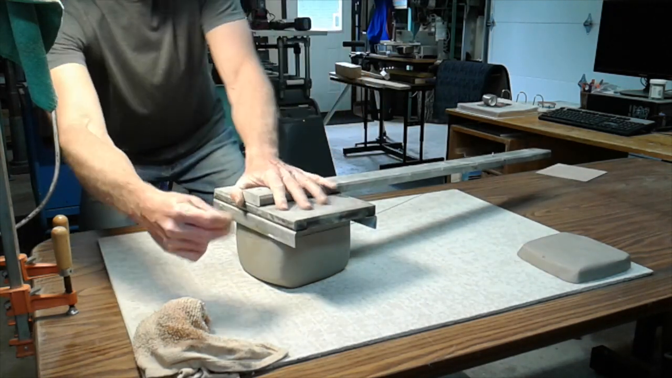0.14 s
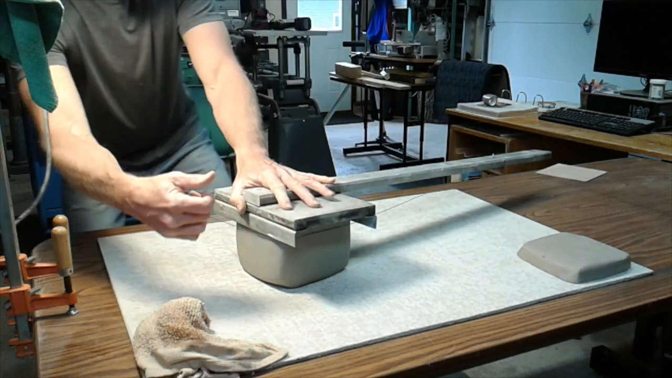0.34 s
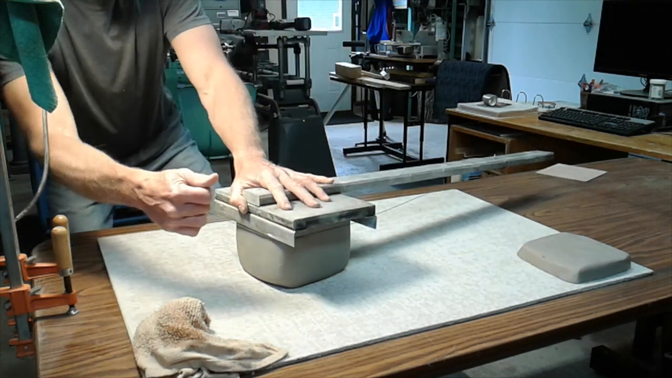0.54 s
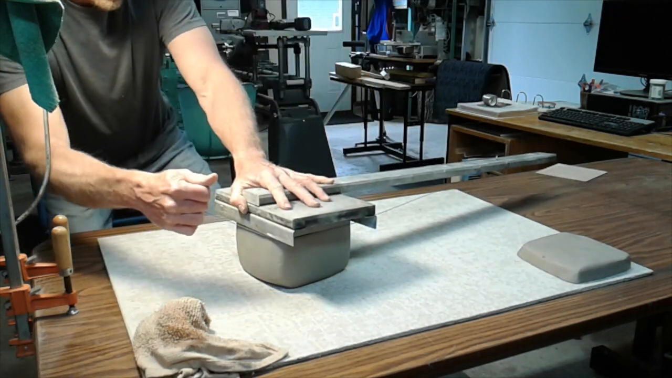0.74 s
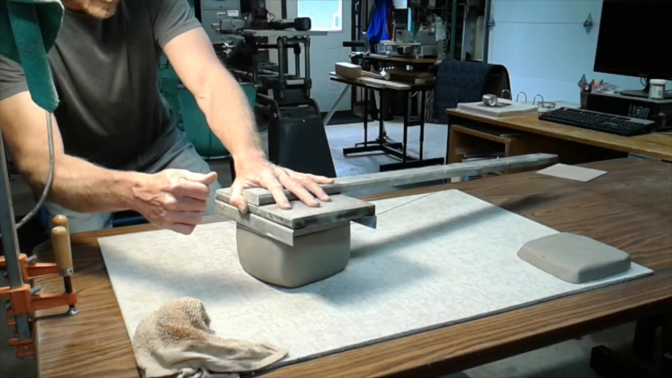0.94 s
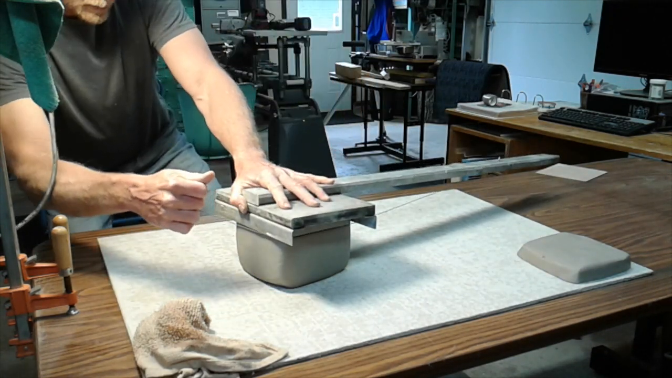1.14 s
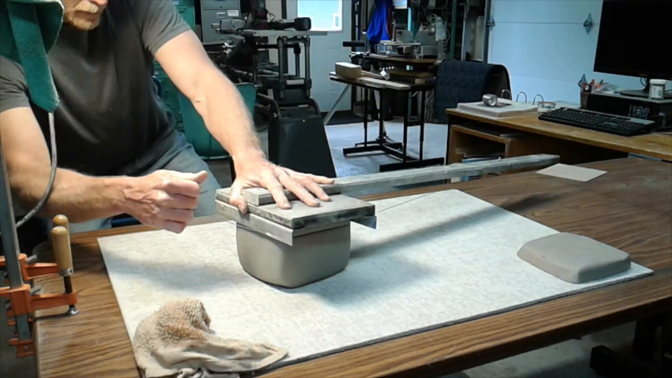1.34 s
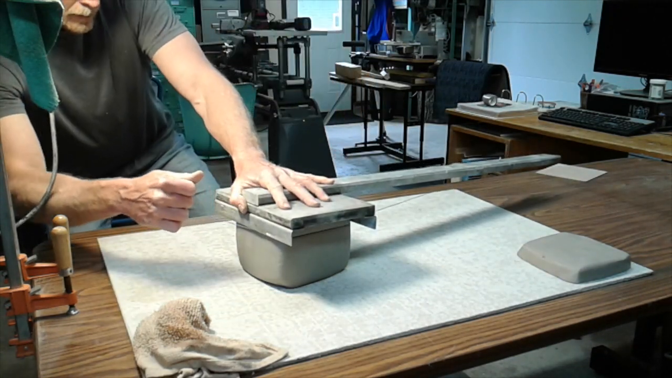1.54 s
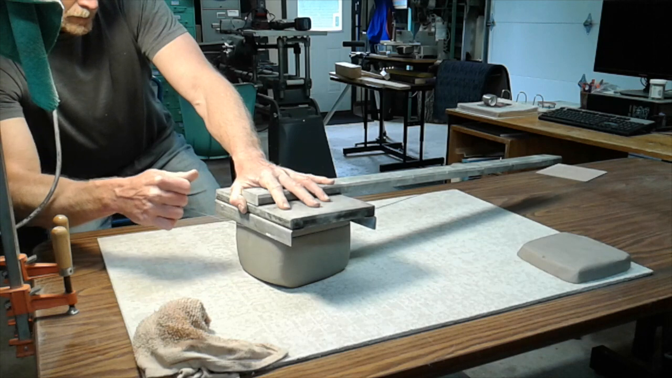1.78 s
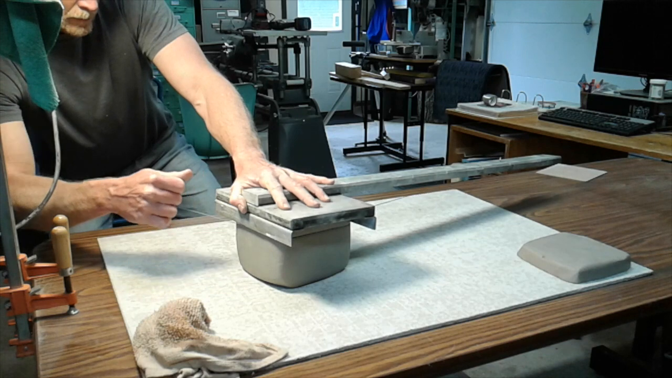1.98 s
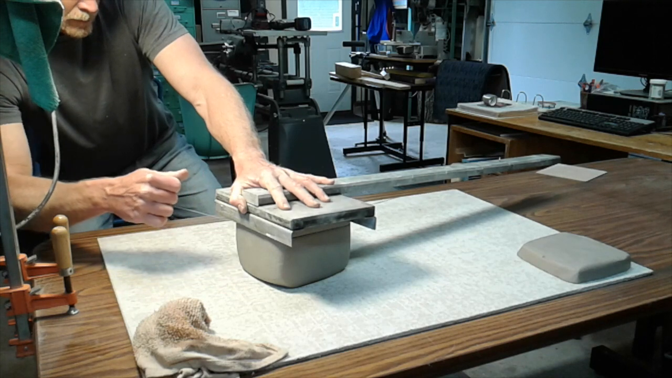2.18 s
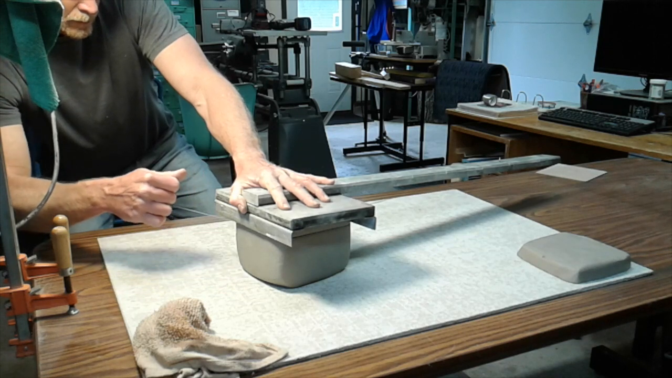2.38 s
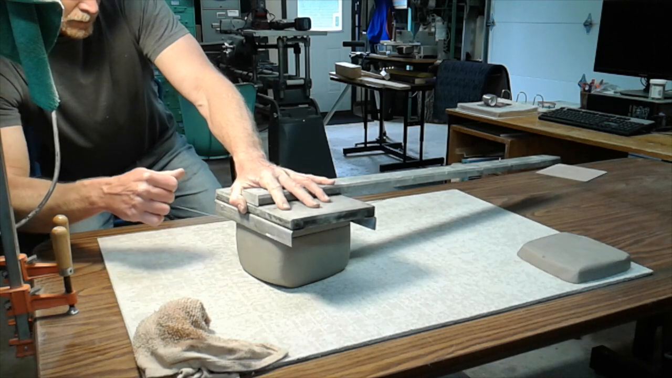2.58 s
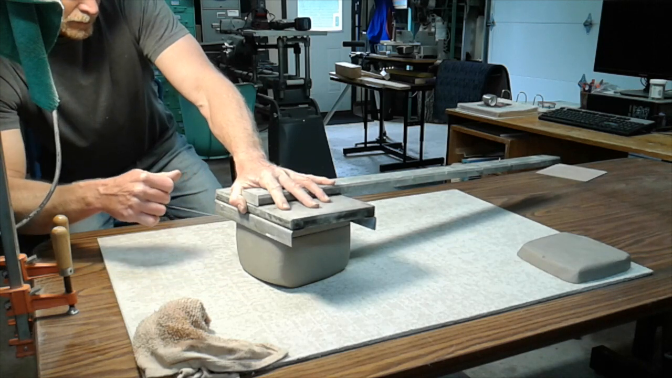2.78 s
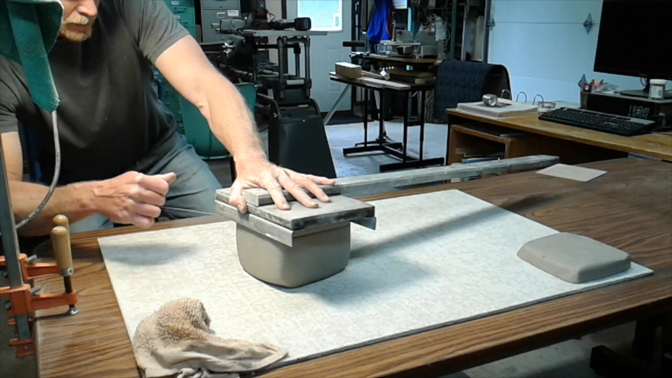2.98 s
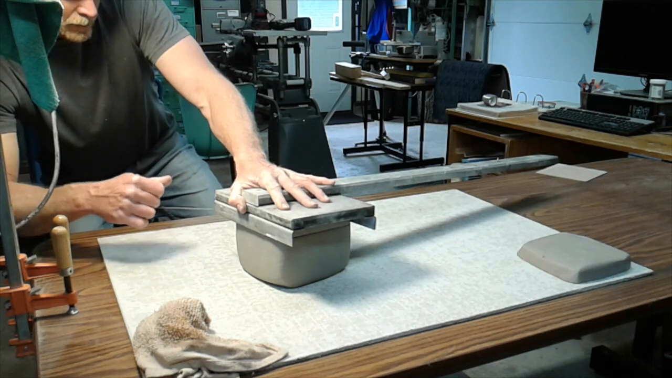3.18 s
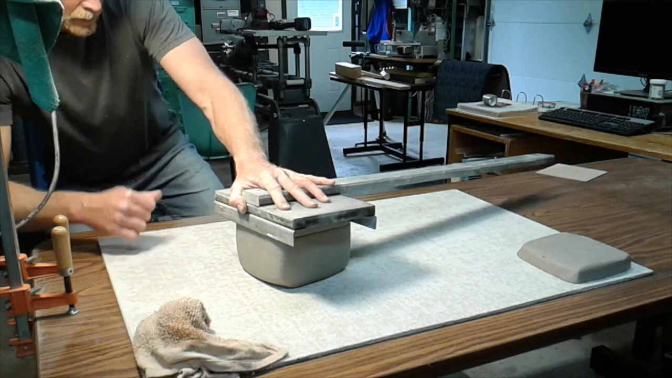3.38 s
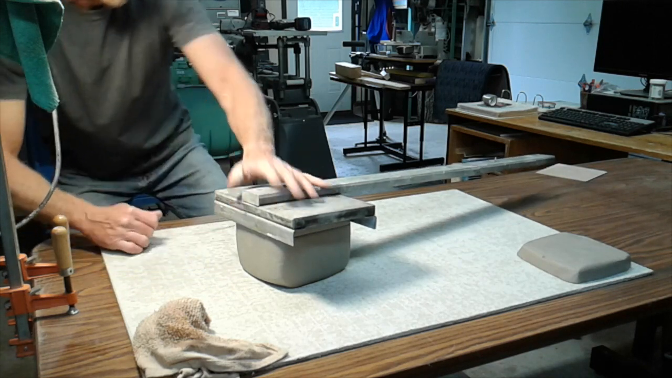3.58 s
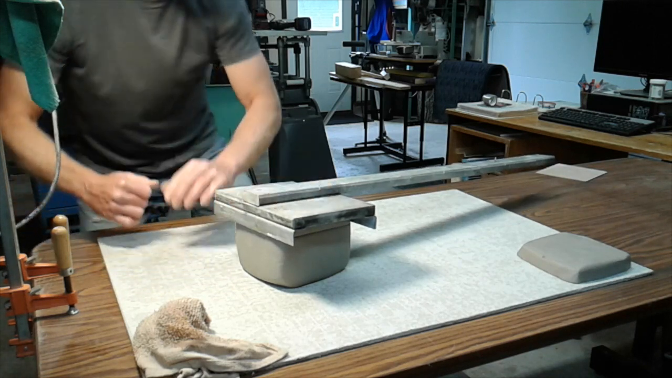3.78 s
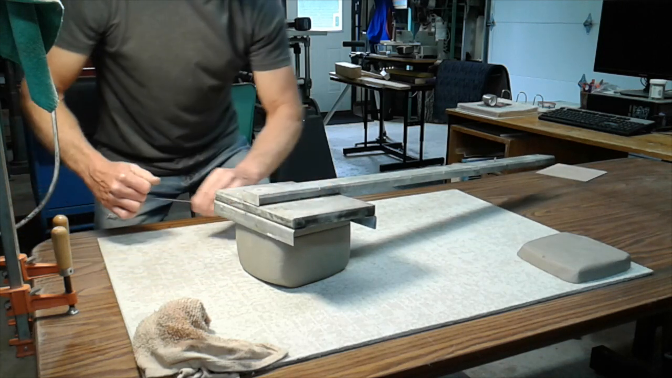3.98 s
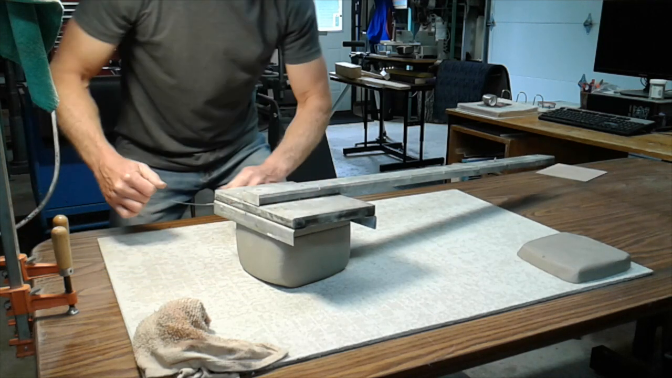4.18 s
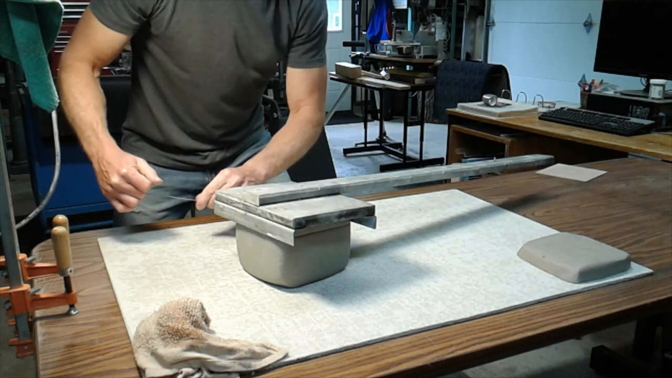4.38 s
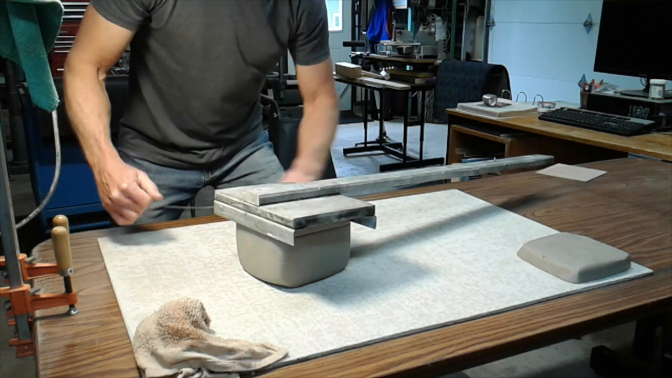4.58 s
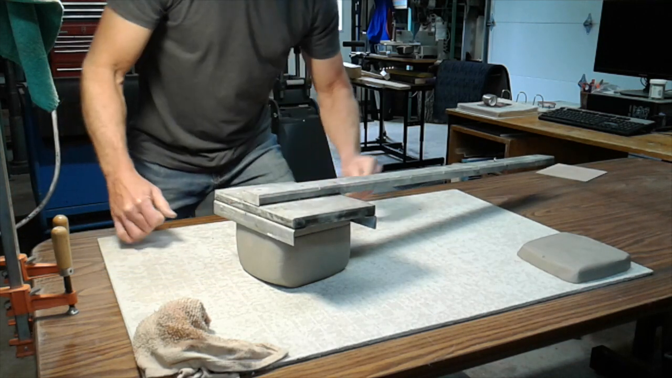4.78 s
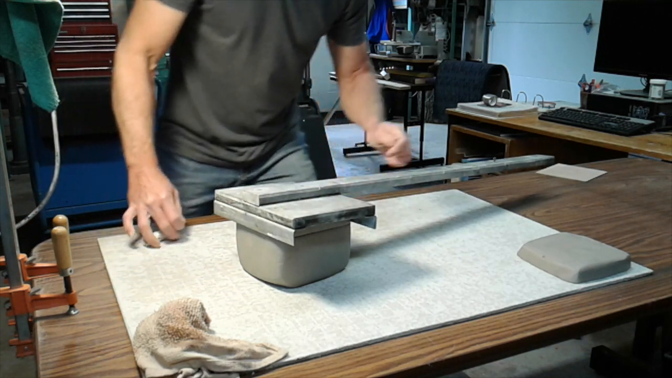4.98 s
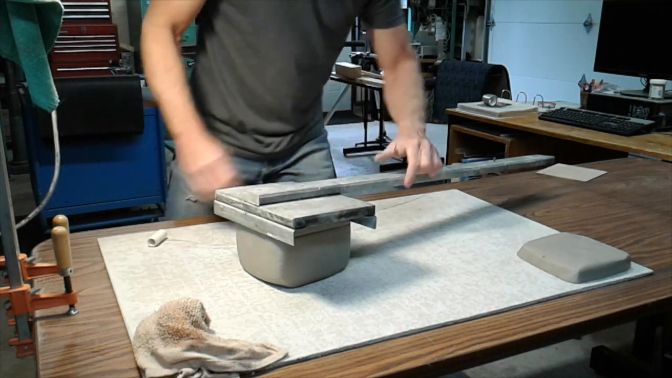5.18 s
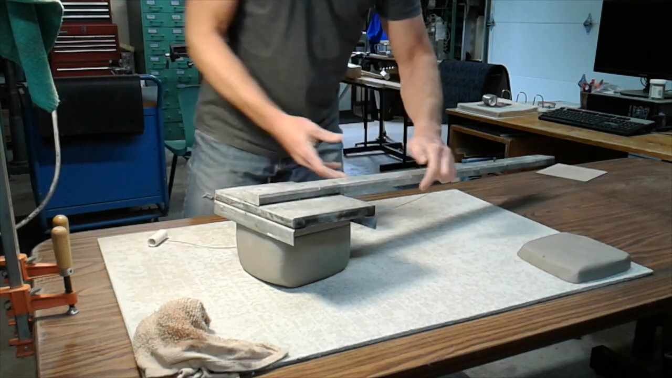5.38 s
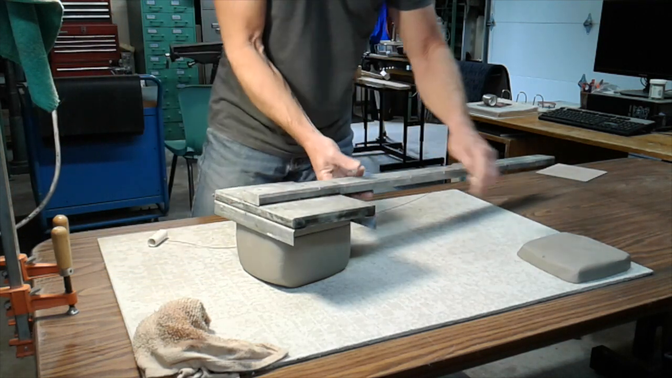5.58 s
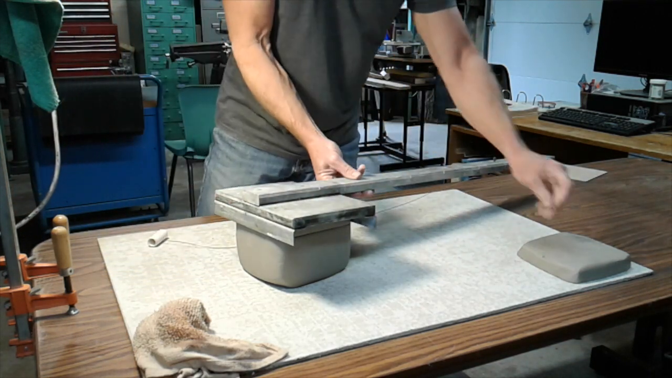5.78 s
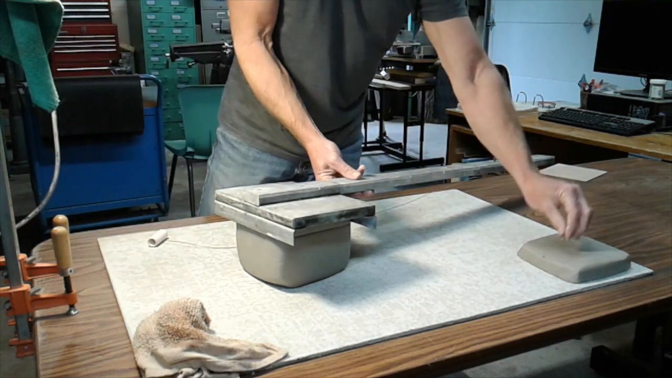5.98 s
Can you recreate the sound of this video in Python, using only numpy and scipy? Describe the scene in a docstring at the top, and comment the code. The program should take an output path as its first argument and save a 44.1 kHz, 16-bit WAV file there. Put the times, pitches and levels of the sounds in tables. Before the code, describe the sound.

Gritty stop-and-go wire scraping with metallic snaps and short groans ends in a sharp tear, followed by a wooden double knock and light skittering clicks.

```python
"""A cutting wire rasps through a block of clay along metal guides, catches, slips and at last rips free.
Its wooden handle is then dropped on the table and bounces; the slack wire skitters in short slides.
Friction is random grains through the guides' resonances; impacts are bursts through guides or table,
and light clicks are short ringing peaks with a noise scuff.
A hard-walled workshop answers nearly every sound, over air noise and a faint hum.
"""
import sys
import numpy as np
from scipy import signal
from scipy.fft import rfft, irfft, next_fast_len
from scipy.io import wavfile
from scipy.ndimage import map_coordinates

SR = 44100
rng = np.random.default_rng(int(sys.argv[2]) if len(sys.argv) > 2 else 0)


def log_audio(samples):
    """Write samples as a 16-bit WAV file to the path given in sys.argv[1]."""
    # one column per channel
    frames = np.atleast_2d(samples).T
    # limit to full scale, then quantise
    limited = np.clip(frames, -1, 1)
    pcm = np.round(limited * 32767).astype(np.int16)
    wavfile.write(sys.argv[1], SR, pcm)


N = 266272
TIME = np.arange(N) / SR  # s


def amp(db):
    """Decibels to gain."""
    return 10 ** (np.asarray(db) / 20)


def decay(t, t60):
    """Exponential decay, 60 dB down at t60 seconds."""
    return amp(-60 * t / t60)


def unit(x):
    """Scale to rms 1."""
    return x / np.sqrt(np.mean(x ** 2) + 1e-20)


def along(points, hz):
    """Read (Hz, value) points on a log frequency axis."""
    f, v = np.transpose(points)
    return np.interp(np.log(hz + 1), np.log(f + 1), v)


def curves(rows):
    """One value per sample for each column after the time."""
    s, *columns = np.transpose(rows)
    return [np.interp(TIME, s, column) for column in columns]


def during(rows, fade_s=0.033):
    """1 within the span of a curve, fading outside it."""
    first, last = rows[0][0], rows[-1][0]
    return np.interp(TIME, [first - fade_s, first, last, last + fade_s], [0, 1, 1, 0])


def wobble(rate_hz):
    """Smooth random curve through rate_hz knots a second."""
    knots = rng.standard_normal(int(N * rate_hz / SR) + 4)
    return map_coordinates(knots, [TIME * rate_hz])


def grains(size, rate_hz, spread_db):
    """Tiny random slips, rate_hz a second on average, of either sign and unequal strength."""
    signs, sizes = rng.choice([-1, 1], size), rng.uniform(-1, 1, size)
    return (rng.random(size) < rate_hz / SR) * signs * amp(spread_db * sizes)


def response(gain, size=8192):
    """Causal (minimum-phase) impulse response with the given gain of frequency."""
    hz = np.fft.rfftfreq(size, 1 / SR)
    cepstrum = irfft(np.log(np.maximum(gain(hz), 1e-6)))
    cepstrum[1:size // 2] *= 2
    cepstrum[size // 2 + 1:] = 0
    return irfft(np.exp(rfft(cepstrum)))


def coloured(x, gain):
    """Filter a sound by a gain of frequency."""
    return signal.oaconvolve(x, response(gain))[:len(x)]


def body(spectrum, modes, lift_db):
    """Gain of a broad spectrum with resonances standing out of it."""
    def peaks(hz):
        return sum(amp(db) / (1 + (2 * (hz - f) / width) ** 2) for f, width, db in modes)
    return lambda hz: amp(along(spectrum, hz)) * (1 + amp(lift_db) * peaks(hz))


def registers(x, edges_hz):
    """Split a sound into neighbouring bands, each of rms 1."""
    bands = []
    for edge in edges_hz:
        bands.append(signal.sosfilt(signal.butter(5, edge, 'low', fs=SR, output='sos'), x))
        x = signal.sosfilt(signal.butter(5, edge, 'high', fs=SR, output='sos'), x)
    return [unit(b) for b in bands + [x]]


def add(track, s, sound):
    """Mix a sound into the track at time s."""
    start = max(round(s * SR), 0)
    track[start:start + len(sound)] += sound[:N - start]


# Room decay. Each row: frequency in Hz, t60 in s.
WALL_DECAY = [(100, 1), (400, 0.8), (1200, 0.39), (3000, 0.45), (7000, 0.35), (14000, 0.2)]


def workshop(x, wet_db, near_db=-3, near_t60=0.12):
    """Direct sound, a flurry from table and near walls, then the room's tail."""
    hz, t, z = signal.stft(rng.standard_normal(int(SR * .6)), SR, nperseg=256)
    tail = signal.istft(z * decay(t, along(WALL_DECAY, hz)[:, None]), SR, nperseg=256)[1]
    t = np.arange(len(tail)) / SR
    near = rng.standard_normal(len(t)) * decay(t, near_t60)
    late = np.clip((t - .002) / .004, 0, 1)  # reflections enter at 2 to 6 ms
    tail = amp(wet_db) * tail / np.linalg.norm(tail)
    near = amp(near_db) * near / np.linalg.norm(near)
    room = late * (tail + near)
    room[0] = 1
    return signal.fftconvolve(x, room)


# The pull. Each row: time in s, friction level in dB, brightness in dB (higher as the wire runs tighter).
PULL_CURVE = [(0, -48.5, 2), (.12, -56, 0), (.21, -68, 9), (.31, -54, 0.5), (.45, -59, -8), (.69, -51, 0.5),
              (.8, -58, -5.5), (1.06, -51.5, -2.5), (1.24, -46.5, -0.5), (1.54, -52.5, 0.5), (1.92, -48, 1),
              (2.02, -53, 1), (2.13, -53, 1), (2.22, -56.5, 0.5), (2.54, -59, -5.5), (2.76, -50, 0),
              (2.92, -49, 0.5), (3.13, -54, -0.5), (3.24, -46, 5), (3.39, -75, -4)]
# Wire on the guides. Each row: frequency in Hz, level in dB.
GUIDE_SPECTRUM = [(45, -29), (80, -15.5), (160, -3.5), (260, -10.5), (340, -6.5), (800, -3), (1300, -4),
                  (2000, -7), (3200, -4.5), (4400, -12.5), (5500, -12.5), (6700, -8.5), (9800, -39),
                  (15000, -51)]
# Ring of the metal guides. Each row: frequency in Hz, width in Hz, level before the lift in dB.
GUIDE_RING = [(349, 26, -6), (462, 19, -3), (590, 10, -6.5), (793, 16, 4), (810, 45, -7), (1107, 96, 1.5),
              (1450, 24, -8.5), (1835, 54, -4), (2490, 25, 1.5), (2660, 39, 2), (3096, 35, -2),
              (4880, 74, 4), (6100, 210, -13)]
USUAL_DB = -51.5  # friction of a steady pull
DRAG_DB, RASP_DB, GRIT_DB, HISS_DB = -4, -2.5, 0, -6  # relative to the friction level
DRAG_GROWS, HISS_GROWS = .9, 1.22  # dB per dB of friction
DRAG_TILT, RASP_TILT, GRIT_TILT = .3, .1, 0.27  # brightness share: taken from drag and rasp, given to grit


def scrape():
    """Dense micro-slips shake the clay and the guides; a harder pull is louder and hisses more."""
    friction = grains(N, rate_hz=2500, spread_db=9) * amp(2.3 * wobble(70))
    guided = coloured(friction, body(GUIDE_SPECTRUM, GUIDE_RING, lift_db=-4.0))
    ringing = workshop(guided, wet_db=-1.5)[:N]
    drag, rasp, grit, hiss = registers(ringing, [550, 1500, 4200])
    level_db, bright_db = curves(PULL_CURVE)
    effort_db = level_db - USUAL_DB
    return during(PULL_CURVE) * amp(USUAL_DB) * (
        drag * amp(DRAG_DB + DRAG_GROWS * effort_db - DRAG_TILT * bright_db)
        + rasp * amp(RASP_DB + effort_db - RASP_TILT * bright_db)
        + grit * amp(GRIT_DB + effort_db + GRIT_TILT * bright_db)
        + hiss * amp(HISS_DB + HISS_GROWS * effort_db + bright_db))


# Catches of the wire. Each row: time in s, strength in dB, brightness in dB.
SLIP_EVENTS = [(.004, -67, -5), (0.0962, -66, -0.5), (.2206, -71.5, -4), (0.254, -62, 1),
               (.2829, -61, -1.5), (.3227, -63, -1.5), (.3679, -59, -2), (0.481, -65.5, -4),
               (0.5046, -64, -1), (0.555, -61, -2), (.702, -59.5, -0.5), (.821, -53.5, 1),
               (0.9206, -53.5, 0.5), (1.071, -71, -5), (1.1263, -49.5, 0), (1.161, -56.5, -2),
               (1.2072, -54.5, -1), (1.3209, -55.5, 0), (1.4046, -56.5, 1.5), (1.4551, -55, 0.5),
               (1.574, -54, 1), (1.7471, -58, 1.5), (1.811, -57.5, 2.5), (1.8898, -58.5, -1),
               (2.0494, -57, 1.5), (2.0724, -55.5, -0.5), (2.1209, -58.5, 0), (2.258, -73, 4),
               (2.285, -68, 0), (2.428, -73, -1), (2.5081, -60, -4), (2.58, -56, -5), (2.6345, -59, -4),
               (2.6868, -58, -3), (2.7848, -61, -3), (2.8994, -62.5, 8), (3.0612, -58, 2),
               (3.1879, -61, 1.5), (3.2133, -58, 5), (3.2241, -54, 2)]
SLIP_T60, SNAP_T60, SNAP_DB = 0.039, 0.017, 3  # chatter decay s; the first snap is shorter and stronger
KNOCK_DB, ZING_DB = -.5, -6  # low and high ring, relative to the strength
CRACK_TILT = .35  # share of the brightness given to the mid-range crack


def slips():
    """Each catch lets go with a snap and a chatter; both ring the guides, as a dull knock or bright zing."""
    out, t = np.zeros(N), np.arange(int(SR * .1)) / SR
    guides = response(body(GUIDE_SPECTRUM, GUIDE_RING, lift_db=-4.5))
    # a snap is too brief to shake the heavy block
    guides = signal.lfilter(*signal.butter(2, 260, 'high', fs=SR), guides)
    knock, crack, zing = registers(guides, [1400, 4500])
    envelope = decay(t, SLIP_T60) + amp(SNAP_DB) * decay(t, SNAP_T60)
    for s, db, bright_db in SLIP_EVENTS:
        chatter = grains(len(t), rate_hz=7000, spread_db=4.5) * envelope
        ring = (knock * amp(KNOCK_DB - bright_db)
                + crack * amp(CRACK_TILT * bright_db)
                + zing * amp(ZING_DB + bright_db))
        snap = signal.fftconvolve(chatter / np.linalg.norm(chatter), ring)
        add(out, s, amp(db) * workshop(snap, wet_db=-0.5, near_db=-0.5))
    return out


# Groans of the guide. Each row: start in s, length in s, frequency in Hz, level in dB.
GROAN_EVENTS = [(.27, .12, 943, -47.5), (.32, 0.093, 804, -52), (.485, 0.043, 755, -46.5),
                (.555, 0.078, 755, -46.5), (.68, 0.082, 880, -51), (0.351, .09, 3100, -56.5),
                (0.502, 0.18, 3260, -56), (1.017, 0.084, 2700, -53), (1.127, .07, 1120, -47),
                (1.127, 0.062, 590, -48.5), (2.58, .04, 594, -48), (2.687, 0.048, 860, -45.5),
                (2.79, 0.087, 607, -47), (2.79, .22, 333.6, -52), (2.89, .13, 1188, -49)]
GROAN_Q = 16.3  # frequency over width of the narrow resonance


def groans():
    """Stick and slip feeds one narrow resonance for a moment."""
    out = np.zeros(N)
    for s, length_s, hz, db in GROAN_EVENTS:
        size = int(max(length_s, .02) * SR)
        stick_slip = grains(size, rate_hz=1500, spread_db=7)
        ring = signal.lfilter(*signal.iirpeak(hz, GROAN_Q, fs=SR), stick_slip)
        # the clay damps what lies far from the resonance
        ring = signal.lfilter(*signal.iirpeak(hz, 2, fs=SR), ring)
        groan = unit(ring) * signal.windows.tukey(size, .2)
        add(out, s, amp(db) * workshop(groan, wet_db=-7.5, near_db=-11))
    return out


def shudder(s=1.127, db=-50, hz=175, q=1.9, rise_s=.012, t60=0.71):
    """The hardest catch jolts the heavy block, which rumbles briefly on the table."""
    out, t = np.zeros(N), np.arange(SR // 2) / SR
    band = signal.iirpeak(hz, q, fs=SR)
    rumble = signal.lfilter(*band, rng.standard_normal(len(t)))
    rumble = unit(signal.lfilter(*band, rumble))
    add(out, s, amp(db) * decay(t, t60) * np.minimum(t / rise_s, 1) * rumble)
    return out


# Wire leaving the clay. Each row: frequency in Hz, level in dB.
RIP_SPECTRUM = [(60, -18), (150, 1.5), (260, -8), (650, -13), (1100, -1), (2300, -5), (4500, -14.5),
                (7000, -2), (9000, -19), (12000, -28), (15500, -33)]


def rip(s=3.226, db=-34, rise_s=0.0023, t60=0.13):
    """The taut wire tears out of the last corner of the block."""
    out, t = np.zeros(N), np.arange(SR // 2) / SR
    tear = unit(coloured(rng.standard_normal(len(t)), lambda hz: amp(along(RIP_SPECTRUM, hz))))
    envelope = np.minimum(t / rise_s, 1) * decay(t, t60)
    add(out, s, workshop(amp(db) * envelope * tear, wet_db=-1.0))
    return out


# Loose wire. Each row: frequency in Hz, level in dB.
WIRE_SPECTRUM = [(300, -15.5), (700, -6), (1100, -2.5), (1700, -5.5), (2700, -3.5), (4600, -12), (6000, -4),
                 (7000, 1.5), (8000, -10), (9500, -18.5), (15000, -35.5)]


def twitch(s=3.4605, db=-39, t60=0.016):
    """The freed wire flicks once against the guide."""
    out, t = np.zeros(N), np.arange(int(SR * .05)) / SR
    flick = unit(coloured(rng.standard_normal(len(t)), lambda hz: amp(along(WIRE_SPECTRUM, hz))))
    add(out, s, workshop(amp(db) * decay(t, t60) * flick, wet_db=-1, near_db=-6))
    return out


def release(s=3.583, db=-60, rise_s=0.004, t60=0.59):
    """The steadying hand brushes softly off the guide."""
    out, t = np.zeros(N), np.arange(SR // 2) / SR
    brush = unit(coloured(rng.standard_normal(len(t)), lambda hz: amp(along(GUIDE_SPECTRUM, hz))))
    envelope = np.minimum(t / rise_s, 1) * decay(t, t60)
    add(out, s, workshop(amp(db) * envelope * brush, wet_db=-3.0))
    return out


# Handle hits on the table. Each row: time in s, clack in dB, knock in dB, tick in dB.
DROP_EVENTS = [(4.8507, -57.5, -42, -68), (4.9342, -51.5, -48, -72)]
# Handle on the table. Each row: frequency in Hz, level in dB.
TABLE_SPECTRUM = [(60, -31), (120, -10), (260, -19), (400, -9), (750, -7.5), (1150, -0.5), (1550, -5),
                  (2000, -10.5), (2600, -10), (3300, -20), (4500, -17.5), (5900, -27), (7000, -22),
                  (9000, -45), (15000, -63)]
# Ring of the table top. Each row: frequency in Hz, width in Hz, level before the lift in dB.
TABLE_RING = [(624, 36, -4), (786, 30, 5.5), (1080, 90, 4), (1260, 85, -3), (1465, 35, 4), (1630, 44, -4)]


def drops(rock_db=-6, rock_t60=0.032):
    """The handle lands hard, rocks for an instant and bounces; the table top knocks."""
    out, t = np.zeros(N), np.arange(int(SR * .04)) / SR
    table = response(body(TABLE_SPECTRUM, TABLE_RING, lift_db=-1.0))
    knock, clack, tick = registers(table, [1800, 4500])
    for s, clack_db, knock_db, tick_db in DROP_EVENTS:
        contact = rng.standard_normal(len(t)) * decay(t, rock_t60)
        contact *= amp(rock_db) / np.linalg.norm(contact)
        contact[0] = 1
        ring = knock * amp(knock_db) + clack * amp(clack_db) + tick * amp(tick_db)
        hit = signal.fftconvolve(contact, ring)
        add(out, s, workshop(hit, wet_db=-1.5, near_db=-4.5, near_t60=0.075))
    return out


# Light clicks of handle and wire ends. Each row: time in s, low band in dB, high band in dB.
CLICK_EVENTS = [(4.672, -76, -89), (5.023, -55, -55), (5.07, -59, -59), (5.203, -66.5, -63.5),
                (5.363, -77, -90), (5.406, -77.5, -77.5), (5.455, -76, -80), (5.496, -78.5, -78),
                (5.622, -83, -86)]
# Peaks of a click, coloured by a close reflection. Each row: frequency in Hz, mean level in dB, t60 in s.
CLICK_PEAKS = [(1090, -2, 0.038), (2100, -12, 0.015), (2787, -6, 0.012), (4130, 0.5, 0.022),
               (5260, -0.5, 0.013), (5940, -3, 0.0084), (6850, -10, .012)]


def clicks(contact_t60=0.017, contact_db=-2, edge_hz=7000):
    """Light clicks with short ringing peaks, coloured by a close reflection, strengths drawn anew each time."""
    out, t = np.zeros(N), np.arange(int(SR * .08)) / SR
    for s, low_db, high_db in CLICK_EVENTS:
        strengths_db = rng.uniform(-3, 3, len(CLICK_PEAKS))
        phases = rng.uniform(0, 2 * np.pi, len(CLICK_PEAKS))
        ring = np.zeros(len(t))
        for (hz, level_db, t60), luck_db, phase in zip(CLICK_PEAKS, strengths_db, phases):
            ring += amp(level_db + luck_db) * decay(t, t60) * np.sin(2 * np.pi * hz * t + phase)
        scuff = rng.standard_normal(len(t)) * decay(t, contact_t60)
        contact = coloured(scuff, lambda hz: amp(along(WIRE_SPECTRUM, hz)))
        # the peaks stay mostly in the direct sound; the scuffed table fills the room
        direct = workshop(unit(ring), wet_db=-8, near_db=-8)
        click = direct + amp(contact_db) * workshop(unit(contact), wet_db=5.0, near_db=1.0)
        click = signal.lfilter(*signal.butter(2, edge_hz, fs=SR), click)
        low, high = registers(click, [3400])
        add(out, s, low * amp(low_db) + high * amp(high_db))
    return out


# Slides of the loose wire. Each row: start in s, length before the decay in s, level in dB.
SLIDE_EVENTS = [(0, .11, -56), (3.578, 0.035, -69), (4.032, .03, -72.5), (4.45, 0.34, -79.5),
                (4.94, .07, -61), (5.03, .08, -54.5), (5.15, .11, -54.5), (5.482, .08, -71)]
SLIDE_RISE_S, SLIDE_T60 = 0.017, 0.51  # s


def slack_wire():
    """The loose wire skitters over table and guide in short slides."""
    skitter = coloured(grains(N, rate_hz=2500, spread_db=7.5), lambda hz: amp(along(WIRE_SPECTRUM, hz)))
    motion = np.zeros(N)
    for s, length_s, db in SLIDE_EVENTS:
        rise = np.clip((TIME - s) / SLIDE_RISE_S, 0, 1)
        motion += amp(db) * rise * decay(np.maximum(TIME - s - length_s, 0), SLIDE_T60)
    return unit(workshop(skitter, wet_db=0.0)[:N]) * motion


# Air noise. Each row: frequency in Hz, relative level in dB.
AIR_SPECTRUM = [(12, -31), (20, -3), (32, -21), (70, -2), (116, -2.5), (185, -3), (289, -7), (427, -8.5),
                (478, -11), (549, -13.5), (649, -14), (2030, -23), (5380, -32), (6540, -34.5), (15500, -38)]
AIR_DB = -64
# Machine hum. Each row: frequency in Hz, level in dB.
HUM_TONES = [(176.6, -79), (121.2, -83)]


def room_tone():
    """Steady air noise and a machine hum whose phase wanders slightly."""
    air = unit(coloured(rng.standard_normal(N), lambda hz: amp(along(AIR_SPECTRUM, hz))))
    hum = sum(amp(db) * unit(np.sin(2 * np.pi * hz * TIME + 1.3 * wobble(6.4))) for hz, db in HUM_TONES)
    return amp(AIR_DB) * air + hum


def scene():
    """Everything at the one microphone."""
    cut = scrape() + groans() + slips() + shudder() + rip() + twitch() + release()
    return (cut + drops() + clicks() + slack_wire() + room_tone())[None]


TOP_HZ = 15750


def record(dry):
    """The recorder keeps nothing above its band limit."""
    m = next_fast_len(N + SR // 2)
    passed = np.fft.rfftfreq(m, 1 / SR) < TOP_HZ
    return irfft(rfft(dry, m) * passed, m)[:, :N]


dry = scene()
out = record(dry)
log_audio(out)
```